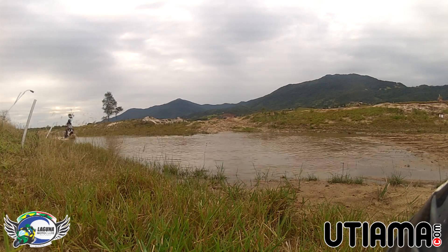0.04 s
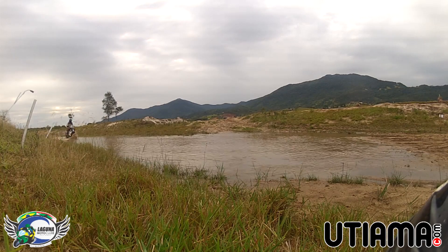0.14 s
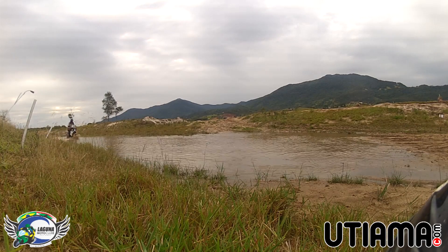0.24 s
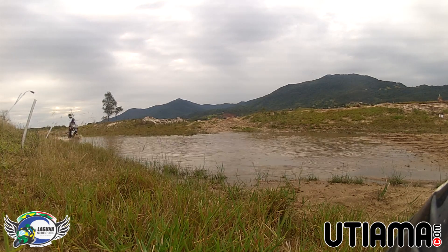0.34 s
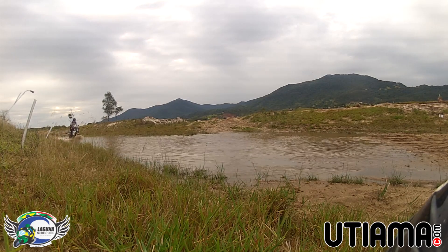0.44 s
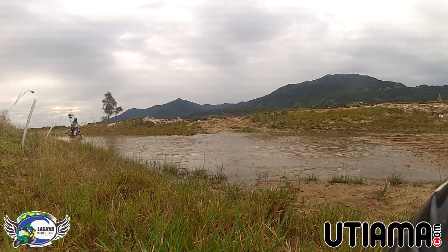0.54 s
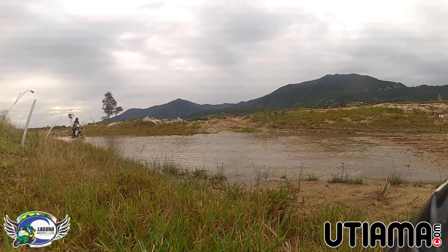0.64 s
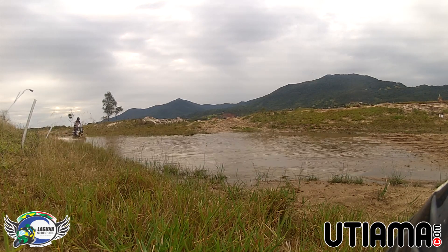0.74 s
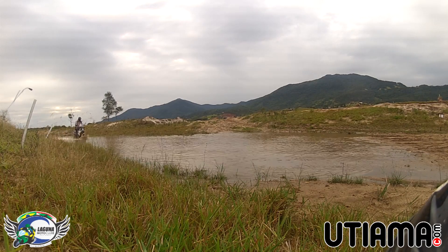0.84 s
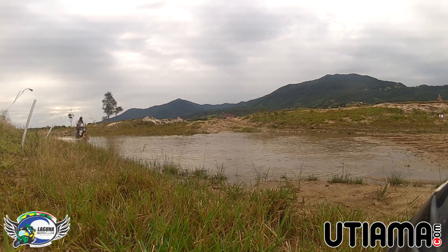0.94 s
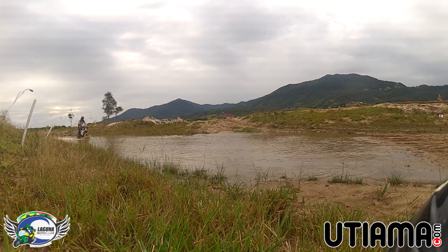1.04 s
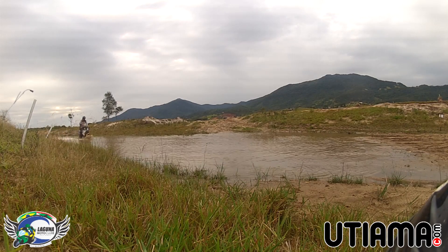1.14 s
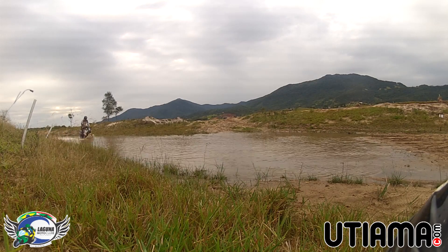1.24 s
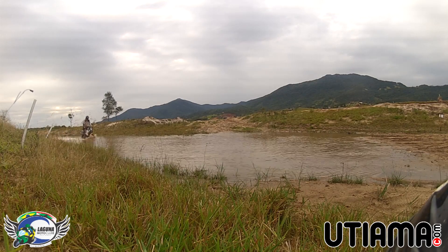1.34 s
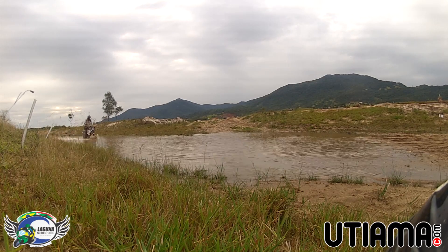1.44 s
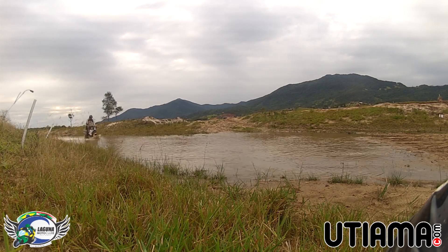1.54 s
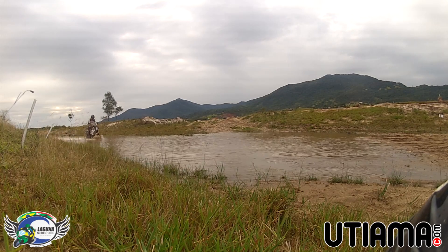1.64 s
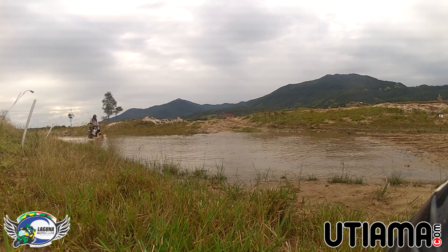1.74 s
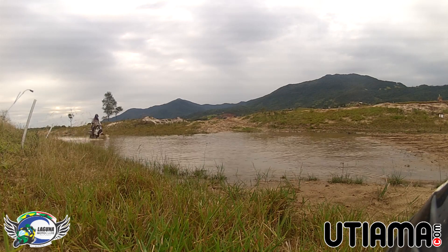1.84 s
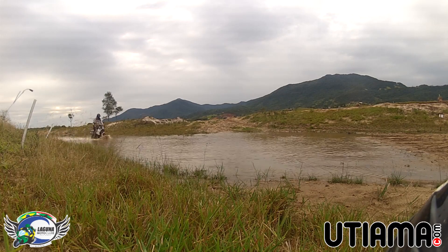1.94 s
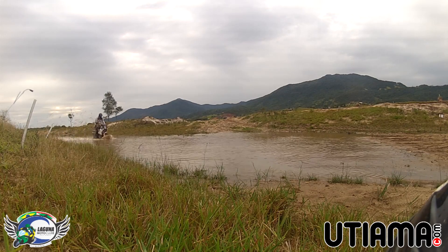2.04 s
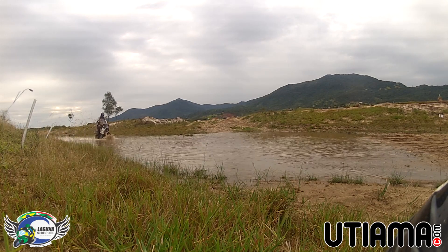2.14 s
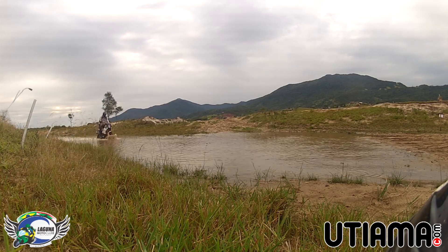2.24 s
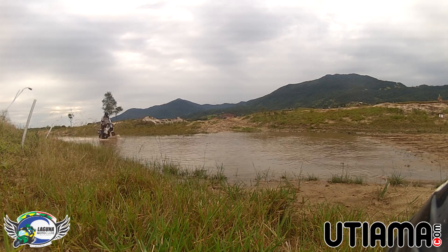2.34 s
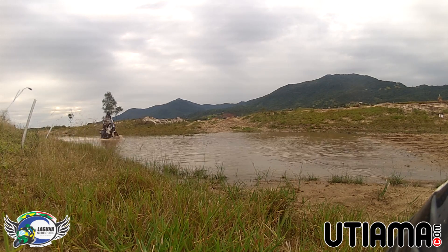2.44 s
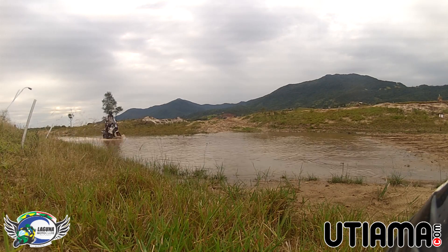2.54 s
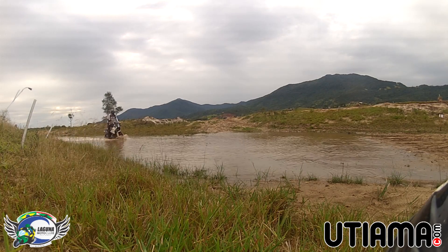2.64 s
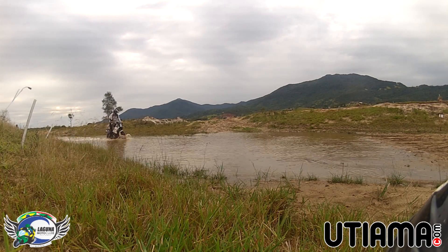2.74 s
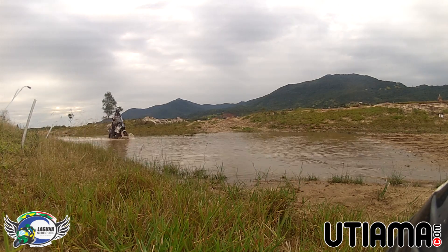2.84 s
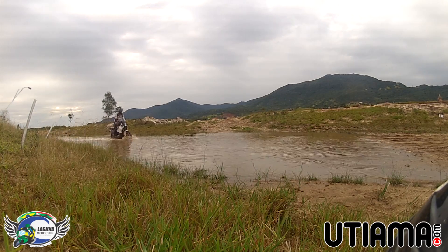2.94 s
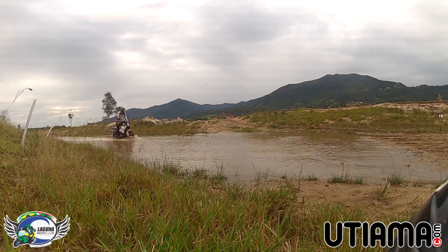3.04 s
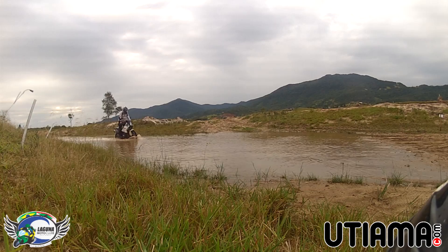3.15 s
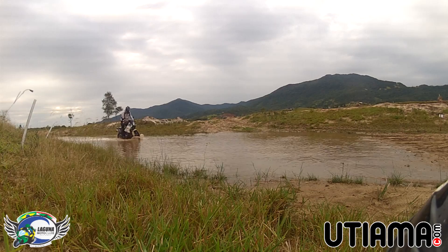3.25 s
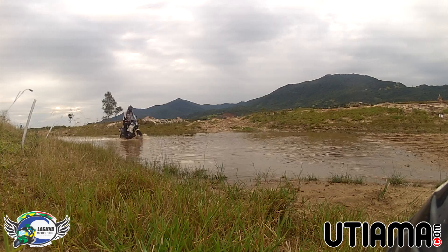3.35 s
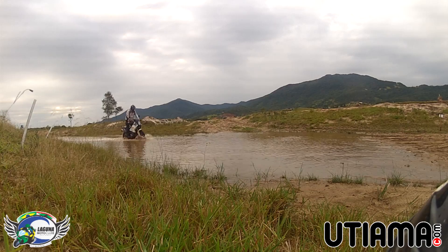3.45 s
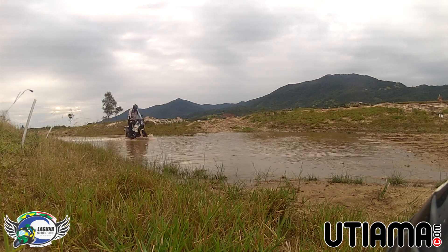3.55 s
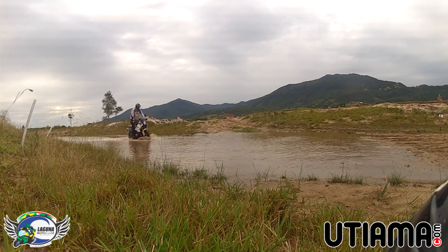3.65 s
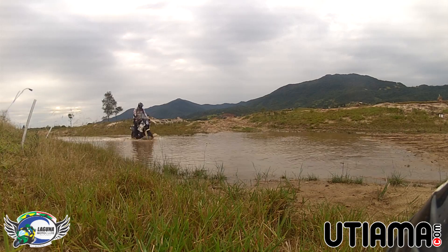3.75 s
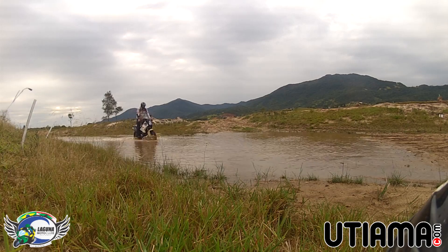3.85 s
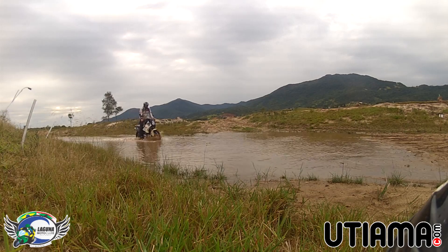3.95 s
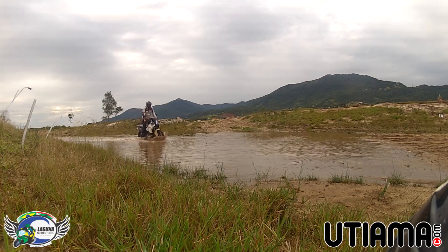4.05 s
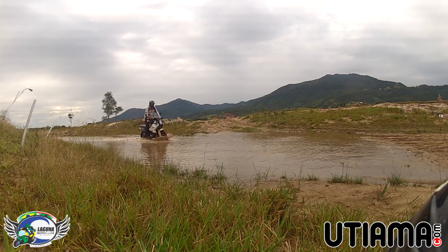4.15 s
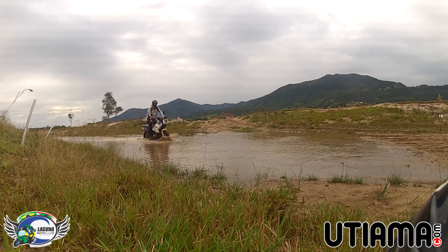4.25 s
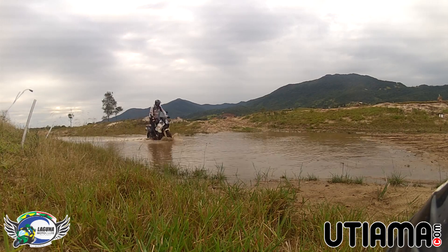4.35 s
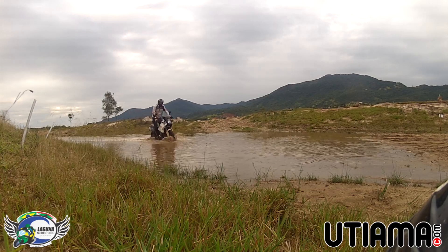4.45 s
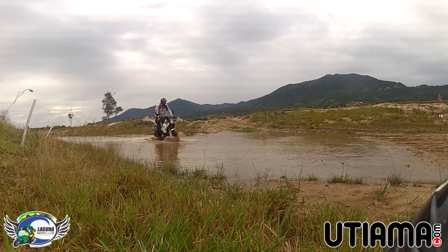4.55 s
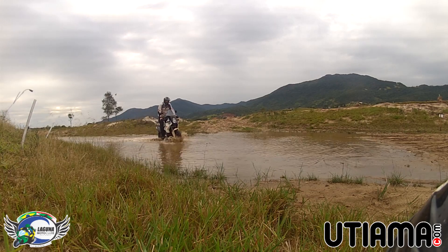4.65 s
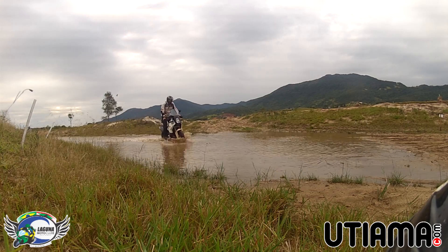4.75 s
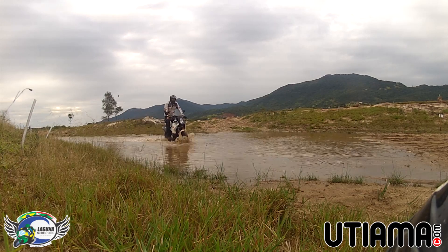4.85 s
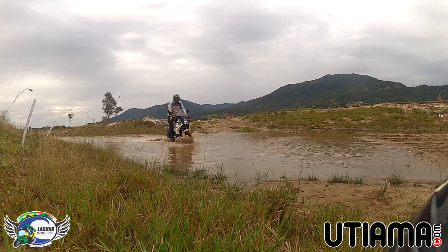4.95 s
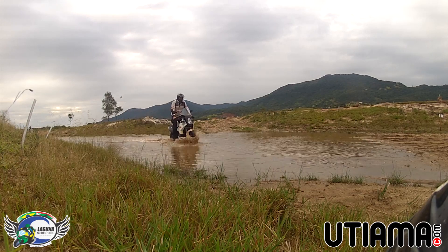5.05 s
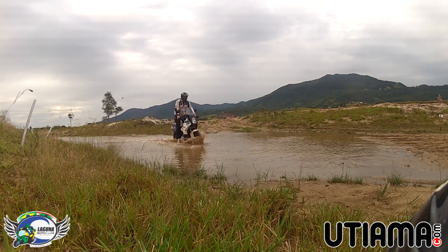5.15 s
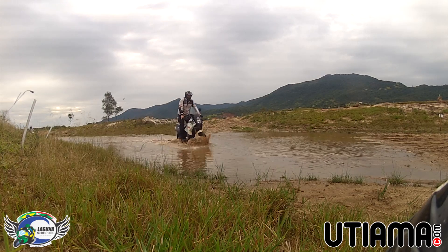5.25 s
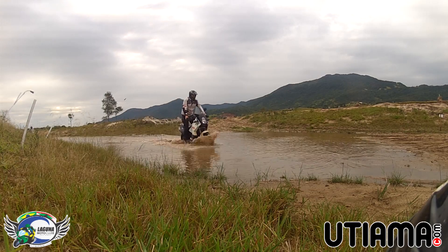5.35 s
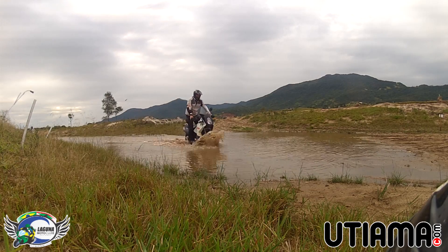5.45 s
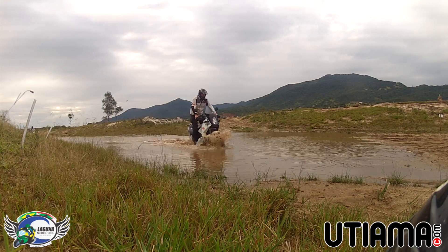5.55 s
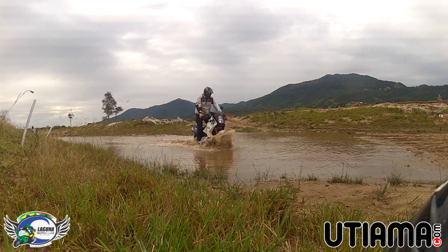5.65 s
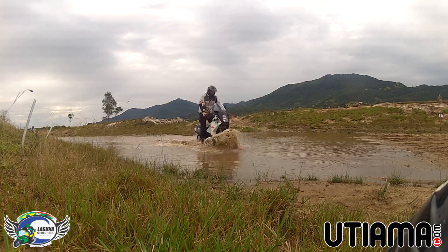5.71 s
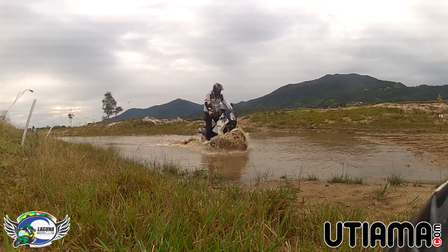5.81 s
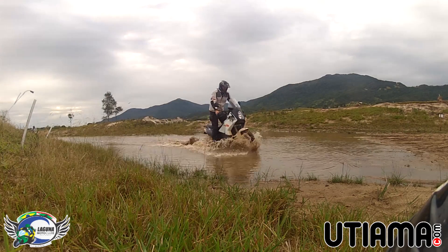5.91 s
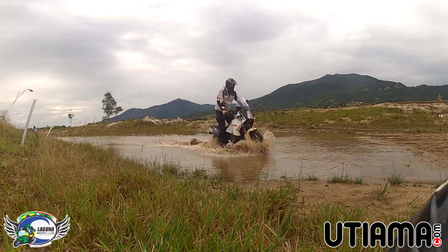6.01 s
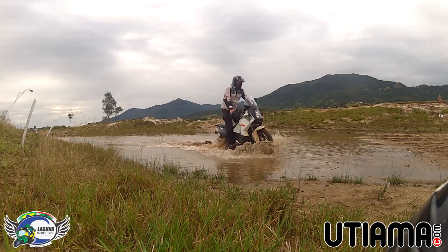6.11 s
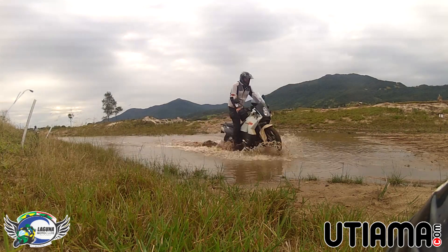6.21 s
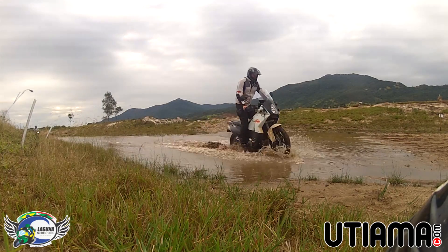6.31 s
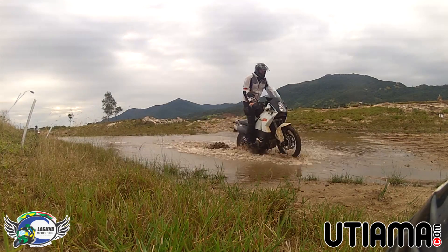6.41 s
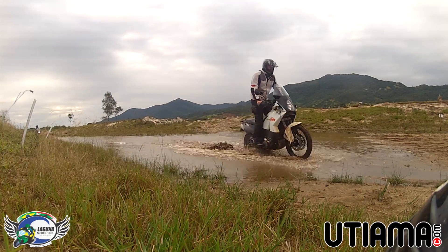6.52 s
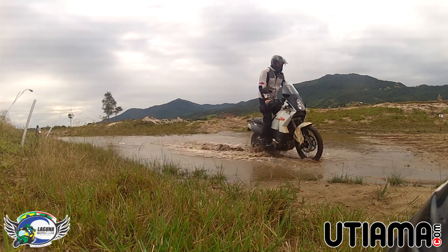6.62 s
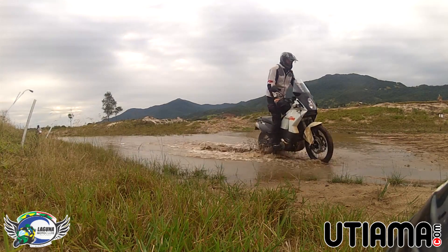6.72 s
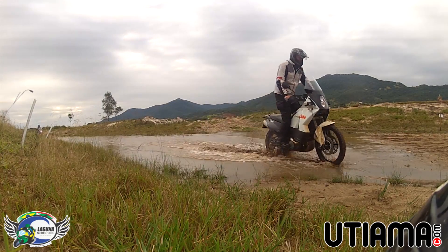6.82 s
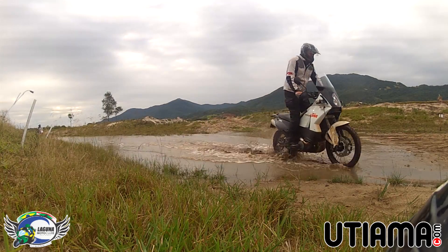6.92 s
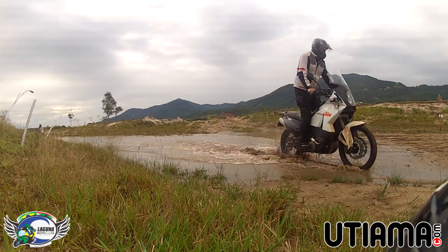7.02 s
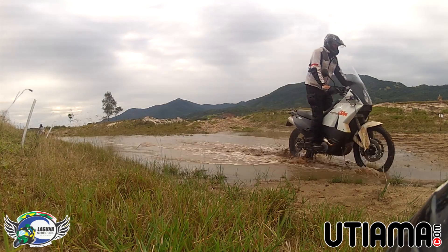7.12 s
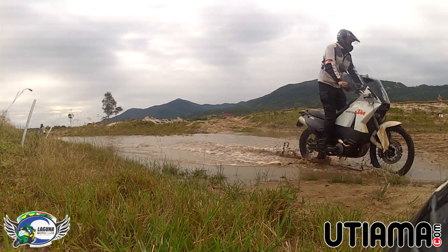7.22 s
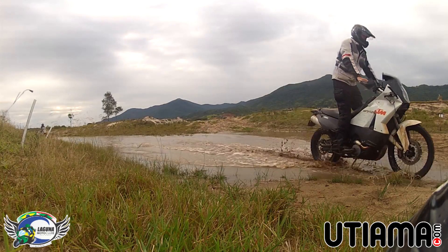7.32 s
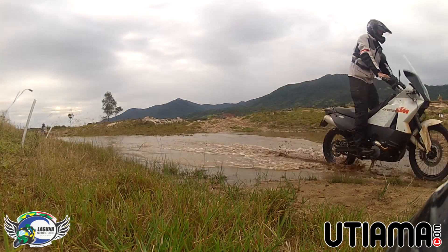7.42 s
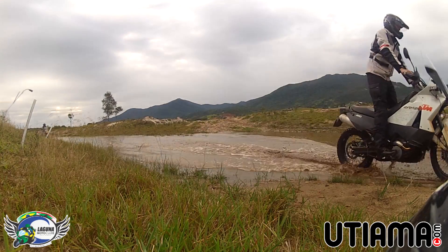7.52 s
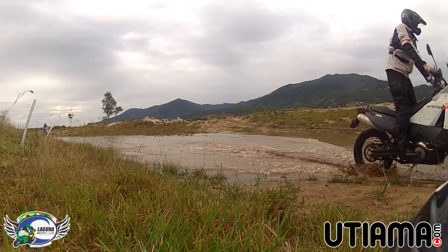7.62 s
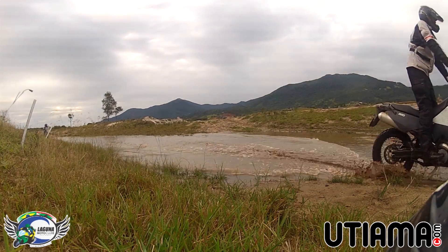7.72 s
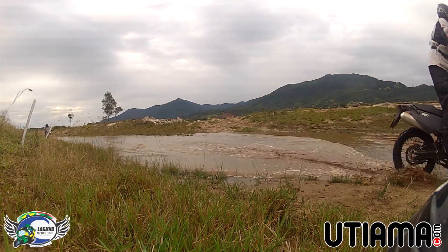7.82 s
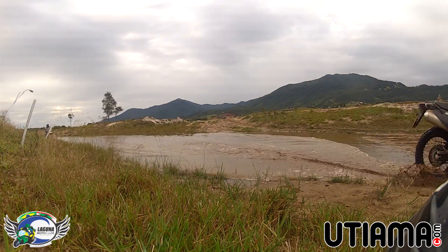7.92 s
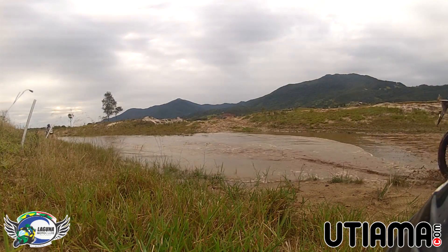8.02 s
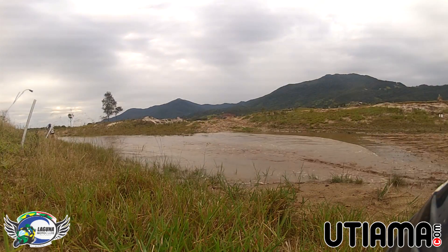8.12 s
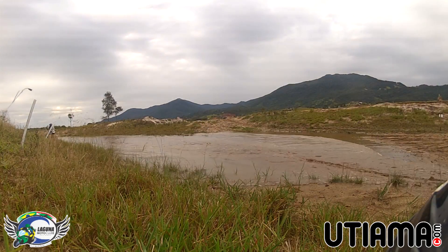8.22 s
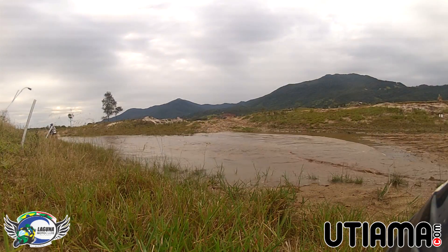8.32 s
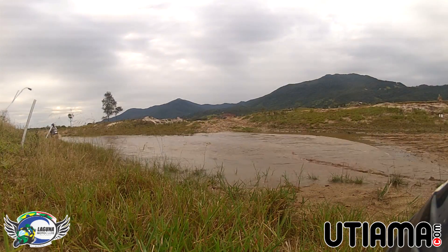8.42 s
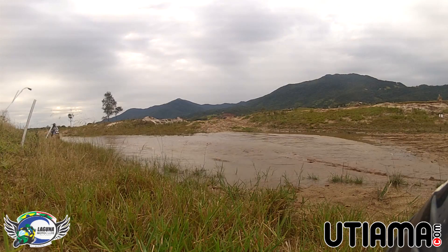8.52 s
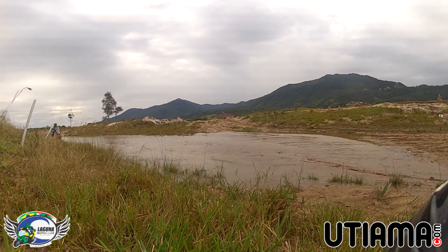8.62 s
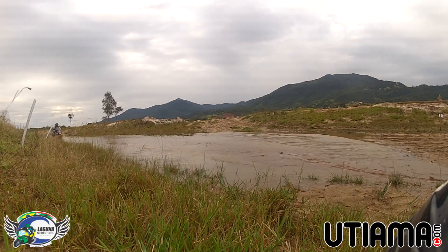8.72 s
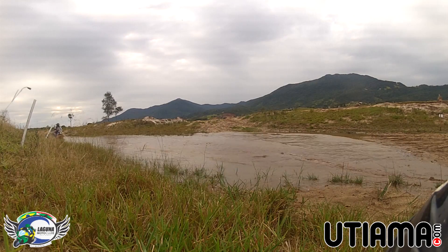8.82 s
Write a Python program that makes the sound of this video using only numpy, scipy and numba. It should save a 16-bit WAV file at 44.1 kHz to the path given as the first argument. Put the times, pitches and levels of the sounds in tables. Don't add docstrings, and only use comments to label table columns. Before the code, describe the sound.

A big twin-cylinder motorcycle throbs and blips its throttle through a muddy pool, growing from distant to close and passing with clatter and water spray.

```python
import sys
import numpy as np
from scipy import signal
from scipy.fft import rfft, irfft
from scipy.io import wavfile
from scipy.ndimage import uniform_filter1d
from numba import njit

SR = 44100
rng = np.random.default_rng(int(sys.argv[2]) if len(sys.argv) > 2 else 0)


def voltage_ratio(level):
    return 10 ** (np.asarray(level, float) / 20)


def to_wav(sig):
    pcm = np.clip(np.atleast_2d(sig), -1, 1) * 32767
    pcm = np.round(pcm).astype(np.int16)
    wavfile.write(sys.argv[1], SR, pcm.T)


N = 391166
TIME_S = np.arange(N) / SR

# start_s, engine_cycles_hz
PLOD = [(0.0, 28.852), (0.242, 22.098), (0.816, 29.369), (2.156, 28.603), (2.671, 17.774), (3.354, 22.023),
        (4.09, 18.901), (5.701, 20.366), (6.218, 13.713), (6.635, 17.136), (7.114, 19.628), (7.582, 15.506),
        (8.87, 16.712)]
# top_s, revs_gained_hz, bell_width_s
THROTTLE_TWISTS = [(0.628, 8.949, 0.109), (0.947, 3.929, 0.169), (1.336, 2.754, 0.08),
                   (1.598, 4.842, 0.071), (1.937, 3.189, 0.065), (2.076, 3.63, 0.051),
                   (3.035, 6.371, 0.099), (3.574, 2.816, 0.17), (3.947, 3.258, 0.065),
                   (4.552, 4.817, 0.162), (5.846, 2.07, 0.095), (6.453, 3.514, 0.089),
                   (6.835, 3.971, 0.147), (7.239, 1.791, 0.077), (8.196, 1.1, 0.387)]
TWIST_LOADS = [0.3, 1.5, -.3, 2.5, 1.7, 2.5, 1.5, 0.75, 0.5, 3, 1.5, 2, 2, 2.4, -0.03]
# start_s, nearness_db, water_thrown_db
APPROACH = [(0, -22, -29), (.5, -18, -4), (1.5, -19, 2.5), (2.7, -15, 1.5), (3.4, -10.5, 1.5),
            (4.2, -11.5, -1), (5.3, -8, 0), (6.2, -6.5, 0.5), (7.0, 0, 1.5), (7.7, -.5, 3), (8.3, 0, -4),
            (8.87, -2.5, -4)]
FAR_NEAR_PAST = [2.1, 7.01, 8.2]
FIRING = [0, .396]

GAS_SURGES = [(-0.037, 0.012, 3.02, 0.77, 1.52), (0.174, 0.039, 2.56, 3.5, 0.6),
              (0.357, 0.015, 3.1, 1.3, 2.37), (0.518, 0.056, 2.4, 2.1, 0.91), (0.801, 0.093, 3, 0.33, 1.77)]
VALVE_PUFFS = [(0, -0.3, 0.15, -0.63), (0.396, -0.046, 0.66, -0.28)]
# pitch_hz, width_hz, front_size, revved_size, behind_size
PIPE_RINGS = [(111.8, 9.9, 2.1, 4.5, 4), (139.2, 45.5, 3.46, 1.4, 0), (293, 52, 0.026, 2.1, -1.96),
              (363, 72, 0.21, -4, 0.3)]
# delay_ms, front_size, revved_size, behind_size
PIPE_ECHOES = [(10.434, 0.77, 1.28, 0.69), (16.15, -0.41, 1.45, -0.33), (20.655, -0.82, -0.74, -0.65),
               (27.2, -0.044, -0.94, 0.19)]
# pitch_hz, width_hz, level_db
SILENCER = [(158.4, 8.7, -1), (243, 18.6, -4.5), (308, 3.8, -4.5), (429, 33.4, 0.5), (200, 28, -13.5)]
# order_per_cycle, level_db
REVVED_ORDERS = [(2, 6.5), (3, -15), (4, 2), (7, -6)]
# order_per_cycle, level_db
PLODDING_ORDERS = [(3, -1.5), (7, -1), (10, 3.5), (11, 1.5), (12, 4.5), (13, 3.5), (15, 2.5), (18, 3)]
# time_s, level_db, bell_width_s
BODY_SHADE = [
    (7.9, -11.5, 0.29),
    (8.6, -5.5, 0.5),
]

# start_s, upper_pitch_hz, lower_pitch_hz
CLATTER_RINGS = [
    (0.0, 2440, 1640),
    (3.65, 2405, 1635),
    (6.35, 2278, 1607),
    (7.78, 2306, 1726),
    (8.3, 2212, 1670),
]
# pitch_hz, width_hz, far_db, near_db, past_db
CASE_RINGS = [(1897, 223, -11, -1.5, -5), (2008, 220, -14, -10, -8.5), (2175, 124, -6, -1.5, -8.5)]
# pitch_hz, width_hz, far_db, near_db, past_db
SPRAY_RINGS = [(3123, 123, 6.5, 1, 5), (3727, 172, 4, 3, -3), (3453, 270, -1, 0.5, 4.5),
               (4700, 1630, -1.5, -9.5, -15), (5220, 420, -9.5, -4, -3), (2800, 11, -30, -9, -25)]
# pitch_hz, width_hz, far_db, near_db, past_db
CHURN_RINGS = [(1084, 79, -22, 2.5, 11), (833, 72, -12, 4, -16), (517, 310, -3, 6.5, -25),
               (960, 1610, -3.5, 1.5, -1), (1210, 54, -3, -2, -32)]
# time_s, level_db, bell_width_s
SPLASHES = [
    (4.4, 5.5, 0.1),
    (6.5, 3, 0.13),
    (8.43, 3.5, 0.11),
]
# pitch_hz, density_db_per_hz
HISS_COLOUR = [(250, -32), (450, 0.5), (800, -11.5), (1500, -10), (2050, -17.5), (2400, -11), (2800, -16.5),
               (4000, -14.5), (5900, -14.5)]
# start_s, pitch_hz, level_db
AIR_POCKETS = [
    (6.47, 551, -60),
    (6.54, 700, -62),
    (6.585, 656, -62),
    (6.77, 827, -71),
]


def level(x, db):
    return x * voltage_ratio(db) / np.sqrt(np.mean(x ** 2))


def curves(table):
    s, *columns = np.transpose(table)
    return [np.interp(TIME_S, s, column) for column in columns]


def far_near_past(values):
    return np.interp(TIME_S, FAR_NEAR_PAST, values)


def bump(cycle, at, width):
    return np.exp(-.5 * (((cycle - at + .5) % 1 - .5) / width) ** 2)


def bells(at, size, width):
    coarse_s = np.arange(0, N + 64, 64) / SR
    total = size @ np.exp(-.5 * ((coarse_s - at[:, None]) / width[:, None]) ** 2)
    return np.interp(TIME_S, coarse_s, total)


def cut(x, hz, kind, order):
    return signal.sosfiltfilt(signal.butter(order, hz, kind, fs=SR, output="sos"), x)


@njit
def svf(x, hz, width):
    y, band, low = np.empty(len(x)), 0., 0.
    for i in range(len(x)):
        g, k = np.tan(np.pi * hz[i] / SR), width / hz[i]
        v = (band + g * (x[i] - low)) / (1 + g * (g + k))
        band, low, y[i] = 2 * v - band, low + 2 * g * v, k * v
    return y


def resonate(x, hz, width_hz):
    return svf(x, hz * np.ones(N), float(width_hz))


def resonate_twice(x, hz, width_hz):
    return resonate(resonate(x, hz, width_hz), hz, width_hz)


def ring(x, modes):
    return sum(voltage_ratio(far_near_past(db)) * resonate_twice(x, hz, 1.5 * width) for hz, width, *db in modes)


def walk(rate):
    k = int(SR / rate)
    steps = np.repeat(rng.standard_normal(N // k + 1), k)
    return uniform_filter1d(uniform_filter1d(steps, k), k)[:N]


def grains(rate, spread_db, ms):
    hit = (rng.random(N) < rate / SR) * voltage_ratio(spread_db * rng.exponential(size=N))
    lumps = signal.lfilter([1], [1, -np.exp(-1000 / (ms * SR))], hit)
    return level(rng.standard_normal(N) * (1 + lumps), 0)


def revving(hz):
    return np.clip((hz - 25) / 5, 0, 1)


def exhaust(hz, cycle, behind, bark_db, ring_db):
    scatter_db, crack_ms, echo_ms = 1.29, 0.74, 0.8
    fast = revving(hz)
    share = np.array([1 - fast - behind, fast, behind])
    chance = voltage_ratio(scatter_db * rng.standard_normal((1200, 2)))
    stroke = chance[np.floor(5 * cycle + 5.7).astype(int)].T
    surge_luck, crack_luck = uniform_filter1d(stroke, size=150)

    sound = surge_luck * sum(np.dot(size, share) * bump(cycle, at, width) for at, width, *size in GAS_SURGES)
    cracks = [crack_luck * bump(cycle, at, crack_ms * hz / 1000) for at in FIRING]
    dull = sum(crack_luck * bump(cycle, at, echo_ms * hz / 1000) for at in FIRING)
    both = sum(cracks)
    for (_, *size), crack in zip(VALVE_PUFFS, cracks):
        sound += np.dot(size, share) * crack
    for pitch_hz, width_hz, *size in PIPE_RINGS:
        sound += np.dot(size, share) * resonate(both, pitch_hz, width_hz)
    for delay_ms, *size in PIPE_ECHOES:
        sound += np.dot(size, share) * np.roll(dull, int(delay_ms * SR / 1000))
    sound += voltage_ratio(ring_db) * sum(voltage_ratio(db) * resonate(both, f, width) for f, width, db in SILENCER)

    sound = cut(cut(sound, 65.2, "high", order=2), 438, "low", order=2)
    sound += (voltage_ratio(bark_db) - 1) * cut(sound, 315, "high", order=2)
    return sound / np.sqrt(uniform_filter1d(sound ** 2, size=SR // 5) + 1e-9)


def heard(pipe, hz, behind):
    fast = revving(hz)
    for orders, share in (REVVED_ORDERS, fast), (PLODDING_ORDERS, 1 - fast - behind):
        pipe = pipe + sum((voltage_ratio(db * share) - 1) * resonate(pipe, round(k) * hz, 12) for k, db in orders)
    shade_db = -0.5 + bells(*np.transpose(BODY_SHADE))
    return pipe + (voltage_ratio(shade_db) - 1) * cut(pipe, 361, "high", order=3)


def clatter(beat):
    rattle = grains(500, 0.26, 0.63) * beat
    upper_hz, lower_hz = curves(CLATTER_RINGS)
    upper = resonate_twice(rattle, upper_hz, 190)
    lower = resonate_twice(rattle, lower_hz, 150)
    whole = upper + voltage_ratio(far_near_past([-9, -1, -4])) * lower + ring(rattle, CASE_RINGS)
    return whole / np.sqrt(uniform_filter1d(whole ** 2, size=SR))


def thrown_spray(beat):
    return level(ring(grains(500, 0.67, 0.34) * beat * voltage_ratio(1.1 * walk(15)), SPRAY_RINGS), 0)


def gear_whine(hz):
    return level(resonate_twice(rng.standard_normal(N), 138 * hz, 190), -10)


def churned_water():
    return level(ring(grains(400, 0.64, 0.69), CHURN_RINGS), 0)


def camera_hiss():
    f = np.fft.rfftfreq(N, 1 / SR) + 1
    pitch_hz, density_db = np.transpose(HISS_COLOUR)
    colour = voltage_ratio(np.interp(np.log(f), np.log(pitch_hz), density_db))
    return level(irfft(rfft(rng.standard_normal(N)) * colour, N), -64.5)


def glugs():
    swell_s, glide = 0.025, 0.074
    at, hz, db = np.transpose(AIR_POCKETS)[:, :, None]
    age = np.clip(TIME_S - at, 0, 1) / swell_s
    turn = 2 * np.pi * hz * swell_s * age * (1 + glide * age / 4)
    return np.sum(voltage_ratio(db) * age * np.exp(1 - age) * np.sin(turn), axis=0)


def tailpipe_jet(cycle):
    facing_s, swell_s = 8.7, 0.31
    puffs = .4 + sum(bump(cycle, at + .05, 0.049) for at in FIRING)
    gas = resonate_twice(rng.standard_normal(N) * puffs, 435, 200)
    return level(gas, -59) * np.exp(-.5 * ((TIME_S - facing_s) / swell_s) ** 2)


def scene():
    top_s, gain_hz, width_s = np.transpose(THROTTLE_TWISTS)
    hz = curves(PLOD)[0] + bells(top_s, gain_hz, width_s)
    load_db = bells(top_s - .05, np.array(TWIST_LOADS), width_s)
    near_db, wake_db = curves(APPROACH)
    cycle = np.cumsum(hz) / SR - .362
    octaves = np.log2(hz / 20)
    behind = np.clip((TIME_S - 7.2) / .5, 0, 1)

    pipe_db = -37 + 0.53 * near_db + 2 * octaves + load_db + 5 * behind
    bark_db = -1.5 + 1.26 * load_db - 3.5 * behind
    ring_db = 12.5 - 5.5 * octaves - 3.5 * behind
    clatter_db = -51.5 + near_db + 1.24 * load_db + octaves
    spray_db = -56 + near_db + wake_db + 0.43 * load_db
    churn_db = -60.5 + 0.48 * near_db + 0.2 * wake_db + bells(*np.transpose(SPLASHES))

    beat = 1 + (.15 + .55 * behind) * (bump(cycle, .85, .06) + .4 * bump(cycle, .3, .06))
    mix = heard(exhaust(hz, cycle, behind, bark_db, ring_db), hz, behind) * voltage_ratio(pipe_db)
    mix += clatter(beat) * voltage_ratio(clatter_db)
    mix += (thrown_spray(beat) + gear_whine(hz) * voltage_ratio(load_db)) * voltage_ratio(spray_db)
    mix += churned_water() * voltage_ratio(churn_db)
    return (mix + camera_hiss() + glugs() + tailpipe_jet(cycle))[None]


def slow_converter(x):
    hold_hz = 12000
    slow = signal.resample_poly(cut(x, 5646, "low", order=7), hold_hz, SR)
    return signal.resample_poly(np.repeat(slow, 4), SR, 4 * hold_hz)


def gate_treble(x):
    f, _, z = signal.stft(x, SR, nperseg=2048)
    power, f = np.abs(z) ** 2, f[:-1, None]
    band = np.repeat(power[:-1].reshape(64, 16, -1).mean(axis=1), 16, axis=0)
    around = uniform_filter1d(power, size=181, axis=0)[:-1]
    z[:-1] *= (band > around * voltage_ratio(2 * -11.0)) | (f < 3900)
    fine = np.repeat(power[:-1].reshape(128, 8, -1).mean(axis=1), 8, axis=0)
    usual = uniform_filter1d(np.median(power[400:700], axis=0), size=9)
    bar_db = -9 + 0.79 * (f - 5400) / 1000 + 3 * (f > 14700)
    z[:-1] *= (fine > usual * voltage_ratio(2 * bar_db)) | (f < 5400)
    return signal.istft(z, SR, nperseg=2048)[1][:N]


def roll_off(x):
    return signal.sosfilt(signal.butter(12, 15440, fs=SR, output="sos"), x)


def record(dry):
    mix = gate_treble(slow_converter(dry[0]))[None]
    return roll_off(mix)


dry = scene()
out = record(dry)
to_wav(out)
```